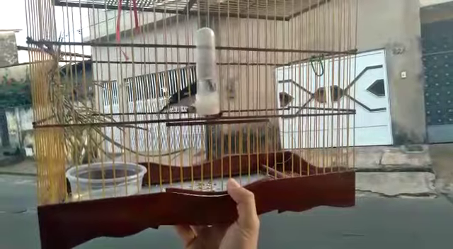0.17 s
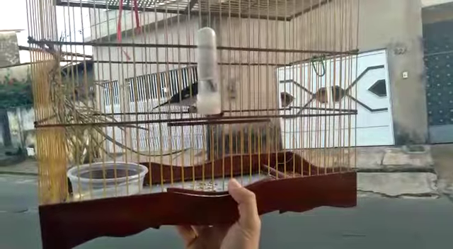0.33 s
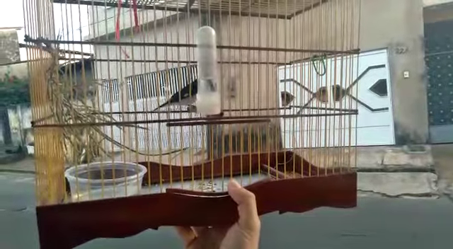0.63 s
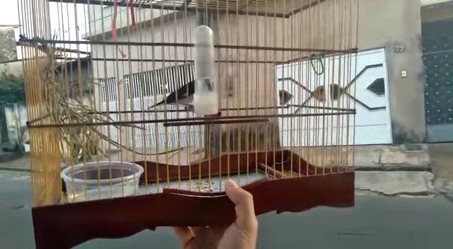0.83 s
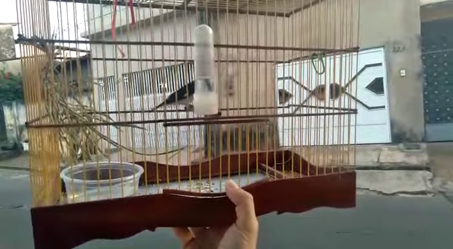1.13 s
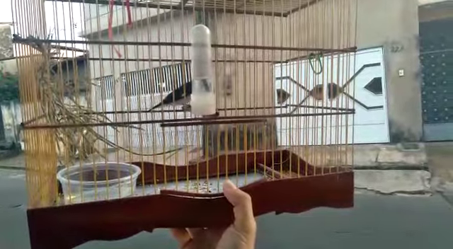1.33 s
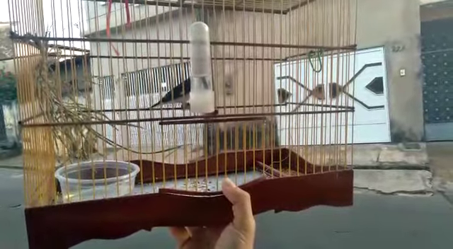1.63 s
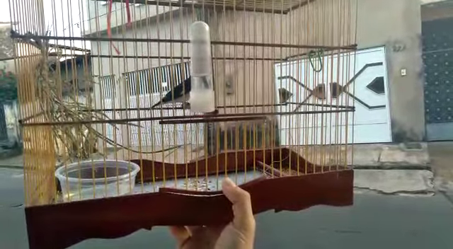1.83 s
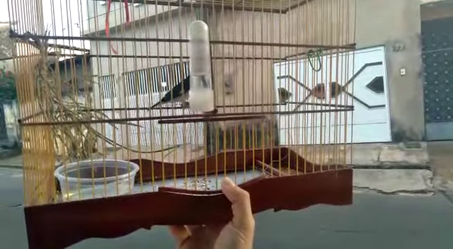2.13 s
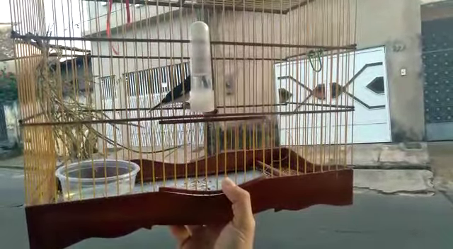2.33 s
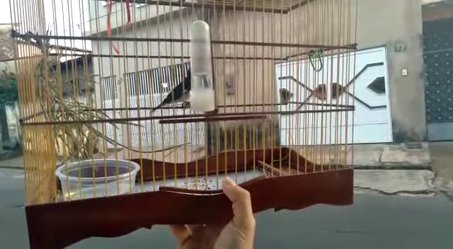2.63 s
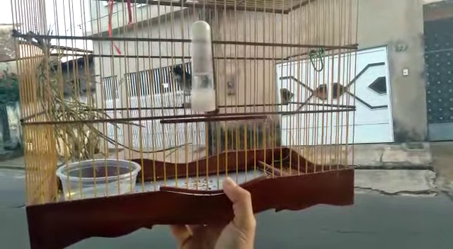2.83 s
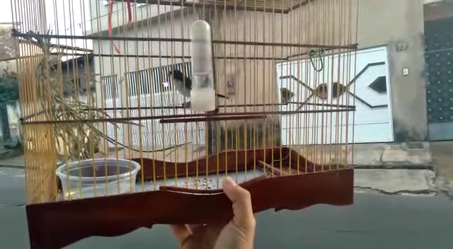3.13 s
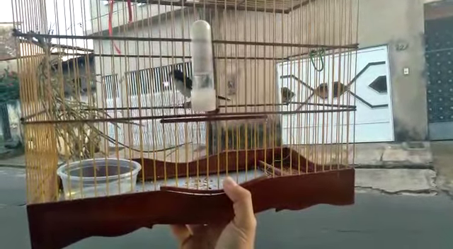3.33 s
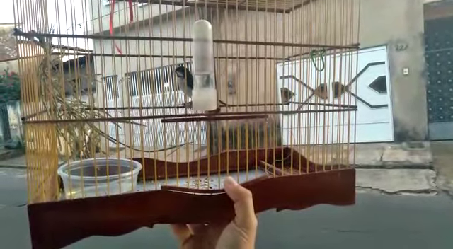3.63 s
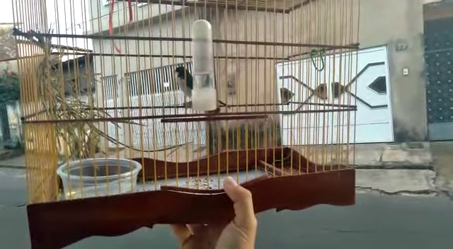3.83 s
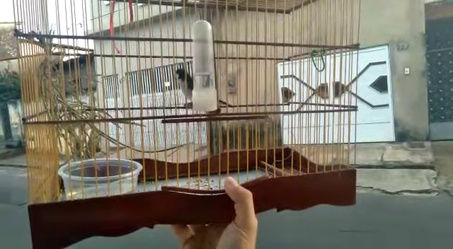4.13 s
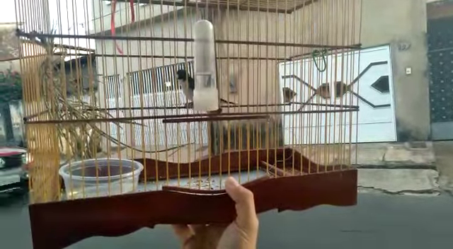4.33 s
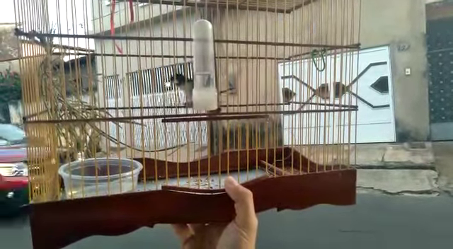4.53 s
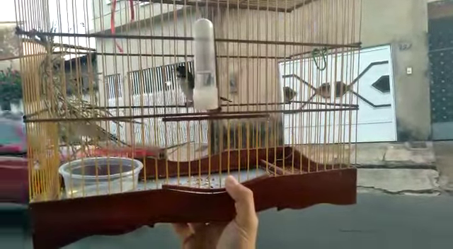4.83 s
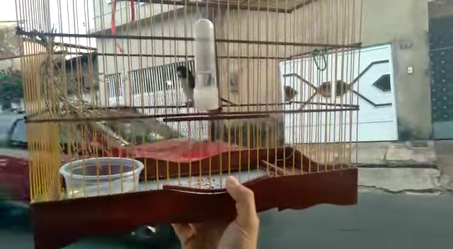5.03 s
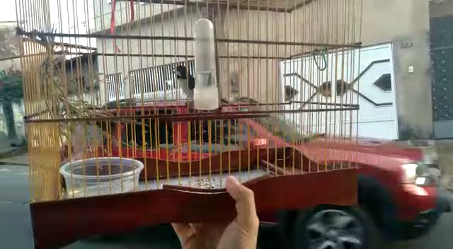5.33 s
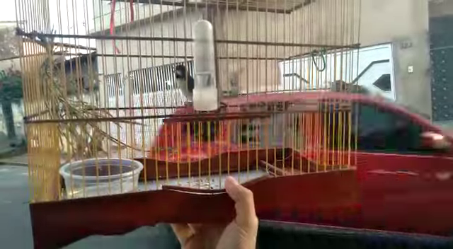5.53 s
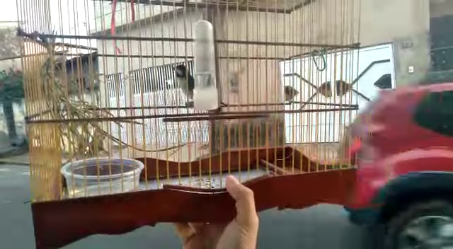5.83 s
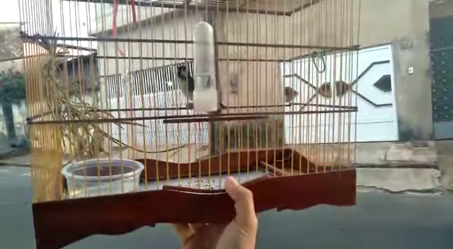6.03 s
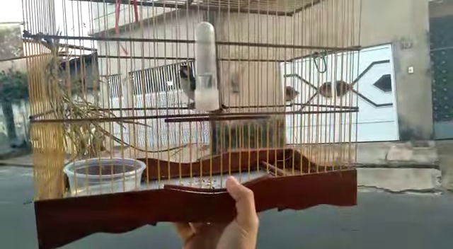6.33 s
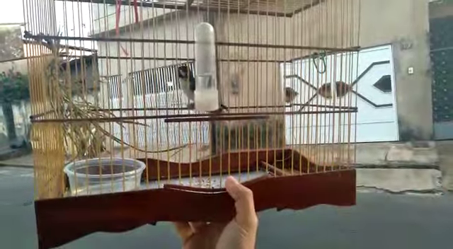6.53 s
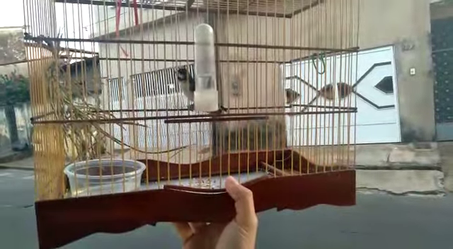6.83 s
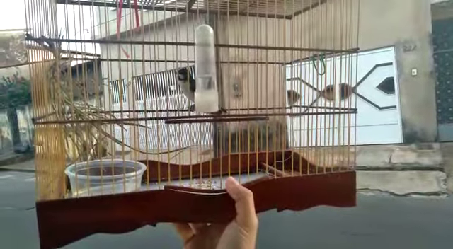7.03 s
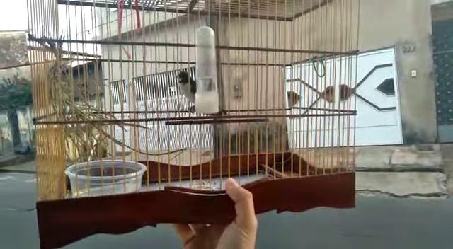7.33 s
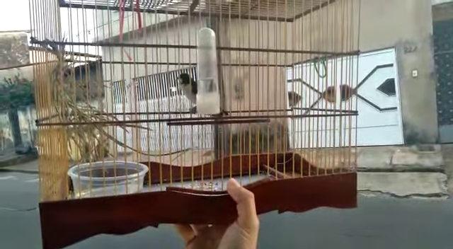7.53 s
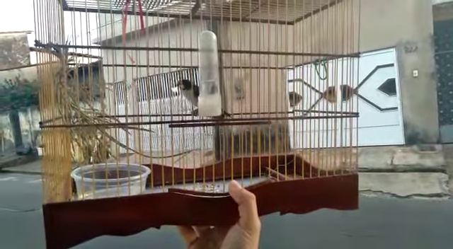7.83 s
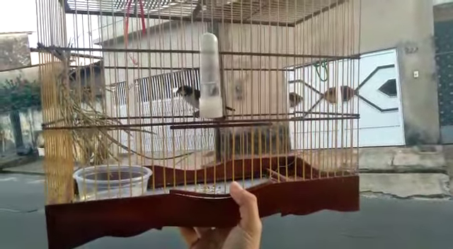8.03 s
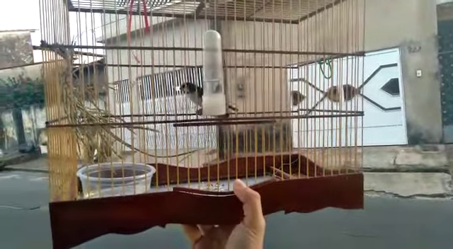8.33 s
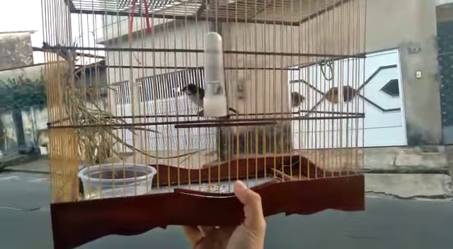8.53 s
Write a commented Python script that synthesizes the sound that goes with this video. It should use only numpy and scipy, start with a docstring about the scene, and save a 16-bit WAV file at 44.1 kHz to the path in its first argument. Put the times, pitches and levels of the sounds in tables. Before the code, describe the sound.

Thin high chirps and a far bird's whistles and trill echo between house fronts over a faint rumble. A car draws near and rolls by, engine humming and tyres hissing. Right by the microphone, a small caged bird gives a pip and four piercing whistles, then a rapid metallic trill that sinks and weakens. Soft dull knocks, wooden cage ticks and a low rustle follow.

```python
"""A narrow street, where a caged seedeater sings a pip, four falling whistles and a fast metallic trill.
Before it, a rival down the street whistles and trills, and small birds call thinly. Each voice is
a nearly pure, sliding tone from the bird's voice organ, and it echoes between the house fronts.
A car rolls past with humming engine and hissing tyres; as it leaves, a low rustle swells.
The wooden cage ticks in the hand, its bars are scratched, and dull knocks come from the street."""
import sys
import numpy as np
from scipy import signal
from scipy.fft import rfft, irfft, next_fast_len
from scipy.io import wavfile
from scipy.ndimage import uniform_filter1d, minimum_filter1d

SR = 44100
rng = np.random.default_rng(int(sys.argv[2]) if len(sys.argv) > 2 else 0)


def wrap_up_sound(samples):
    """Save the sound to the file named by the first command line argument, as 16-bit audio."""
    columns = np.atleast_2d(samples).T
    # keep every value between -1 and 1, then stretch to whole-number steps
    tamed = np.clip(columns, -1, 1)
    steps = np.round(tamed * 32767).astype(np.int16)
    wavfile.write(sys.argv[1], SR, steps)


N = 382347
T = np.arange(N) / SR   # the time of each sample, in seconds

# Levels in the tables are relative: the functions add their own gains and colours.
# The car's engine. Each row: time in seconds, firing rate in Hz, level in dB.
ENGINE_CURVE = [(0, 81, -49), (1.8, 80, -45.5), (2.42, 80.6, -35.5), (2.57, 77, -54), (2.71, 55.54, -36),
                (3.1, 59.3, -36.5), (3.33, 68.5, -33), (4.09, 69.6, -28), (4.43, 65.9, -29),
                (5.01, 56.7, -29.5), (5.2, 56.8, -32.5), (5.34, 89.3, -34.5), (6.1, 82.7, -36),
                (6.6, 74.9, -42), (8.67, 71, -62)]
# Low rumble and roar: the passing car, then a low rustle that swells after 7 seconds.
# Each row: time in seconds, rumble in dB, roar in dB.
RUMBLE_AND_ROAR_LEVELS = [(0.0, -45.5, -50), (0.99, -41.5, -50.5), (1.62, -47.5, -49.5), (1.98, -46, -47),
                          (2.63, -37.5, -41), (2.9, -40.5, -41), (3.57, -36, -37.5), (4.15, -37, -37.5),
                          (4.88, -33.5, -35), (5.84, -34.5, -44.5), (6.45, -38, -47.5), (6.76, -39, -46.5),
                          (7.03, -35.5, -44), (7.32, -34, -41), (8.16, -36.5, -46.5), (8.67, -35, -44)]
# Bands that are weak while the car is far off. Each row: low edge in Hz, high edge in Hz.
HOLLOW_BANDS = [(570, 890), (1750, 22000)]
# Tyre hiss. Each row: time in seconds, main hiss in dB, highest hiss in dB.
HISS_LEVELS = [(0, -48.5, -55), (.7, -45.5, -53.5), (1.5, -45.5, -54.5), (2.2, -40.5, -49.5),
               (3.3, -35, -42), (4.8, -30, -37), (5.3, -35.5, -40), (6, -37.5, -46), (7, -43.5, -53),
               (7.9, -58.5, -71), (8.67, -54, -76.5)]
# Two sounds that swell and fade. Each row: time in seconds, level in dB.
CHORUS_LEVELS = [(0, -36), (.35, -39), (.7, -46), (1.4, -56), (2.5, -34.5), (3.2, -46), (3.8, -36),
                 (5.5, -44), (7.1, -44), (7.6, -76)]   # very distant birds
TREAD_LEVELS = [(3.5, -63), (4.4, -39), (6.2, -45.5), (7, -45), (8.67, -63)]   # the hum of the tyre tread

# One thin, high call, repeated. Each row: start in seconds, length in seconds, level in dB.
THIN_CALL_NOTES = [(0.148, 0.095, -32.5), (1.135, .075, -33), (2.105, 0.084, -35.5), (2.81, 0.053, -34),
                   (3.699, .044, -31), (7.612, 0.088, -34.5), (8.498, 0.068, -31)]
# Sliding notes down the street. Each row: start and length in seconds, first and last pitch in Hz,
# level in dB, buzz swing in Hz, share that arrives directly (0 to 1).
SLIDING_NOTES = [(0, .2, 2326, 2192, -46.5, 0, 0.72), (0.849, 0.2, 3880, 4000, -40, 35, 0.7),
                 (0.977, 0.17, 6750, 3650, -29.5, 251, 0.15), (1.247, 0.13, 6900, 3970, -31.5, 355, .15),
                 (2.655, .18, 3943, 3856, -26.5, 236, .8), (3.092, .14, 3647, 4180, -30, 22, .78),
                 (3.312, .062, 5350, 4570, -27.5, 88, .7), (3.393, 0.042, 4450, 3460, -21.5, 33, 0.8),
                 (7.494, 0.032, 5800, 6600, -38, 350, 0.6), (8.26, .058, 8000, 8800, -44.5, 128, .27)]
# Whistles. Each row: start and length in seconds, pitch before sagging in Hz, level in dB,
# share of the full sag (0 to 1).
RIVAL_WHISTLE_NOTES = [(1.331, .08, 3960, -21, .85), (1.515, .096, 3970, -20.5, 1),
                       (1.604, 0.075, 3780, -32, 0.72)]
CAGED_WHISTLE_NOTES = [(4.972, .049, 4350, -15.5, 0.18), (5.154, .099, 4030, -10.3, 0.98),
                       (5.347, .09, 4105, -4.5, 0.96), (5.532, .094, 4120, -2.5, 1),
                       (5.716, .088, 4100, -3.3, 1)]   # the first is the pip
# The rival's trill. Each row: start in seconds, pitch in Hz, level in dB.
RIVAL_SYLLABLES = [(1.68, 3794, -30), (1.783, 4100, -23), (1.853, 4160, -24), (1.963, 4310, -22),
                   (2.04, 4050, -24), (2.136, 3850, -29), (2.227, 4000, -25), (2.37, 3950, -25.5),
                   (2.455, 3850, -30), (2.525, 4000, -26.5)]
# One syllable (note) of a trill: a lead-in, a loud high part, a step down, a slide away.
# Each row: share of its length (0 to 1), pitch ratio at full fall, level in dB.
SYLLABLE_SHAPE = [(0, .95, -25), (.07, 0.97, -1), (.14, .97, -18), (.2, 1, 1), (.51, .99, 2), (.6, .8, -3),
                  (.82, .75, -5), (0.891, .65, -21), (1, .52, -30)]
# Quick slides as a loud whistle opens or snaps shut.
# Each row: start in seconds, first pitch in Hz, last pitch in Hz, level in dB.
FLICK_NOTES = [(5.341, 2700, 3700, -36), (5.434, 3900, 3550, -9), (5.527, 2700, 3680, -29.5),
               (5.626, 4050, 3420, -10), (5.712, 2700, 3690, -30.5), (5.813, 4200, 3000, -24.5)]
# The caged bird's trill, which slows, sinks and weakens as it tires. Each row: start and length in
# seconds, pitch in Hz, share of the full fall (0 to 1), warbles per second, swing in Hz, level in dB.
CAGED_SYLLABLES = [(5.877, .028, 3300, .3, 60, 450, -10), (5.894, .06, 3500, .5, 105, 560, -7),
                   (5.981, .063, 4340, 0.99, 80, 500, -3.5), (6.073, .062, 4450, 0.99, 80, 480, -2.5),
                   (6.164, .064, 4440, 0.95, 80, 480, -2.5), (6.254, .062, 4400, 0.92, 82, 480, -2),
                   (6.345, .063, 4373, 0.94, 80, 500, -2.5), (6.437, .064, 4285, 0.99, 80, 540, -3),
                   (6.532, .064, 4200, 1, 73, 580, -3.5), (6.628, .063, 4080, 1, 72, 620, -4.5),
                   (6.717, .063, 4030, 1, 76, 620, -5), (6.828, .062, 3840, 0.97, 68, 660, -8.5)]
# Reflections close to the cage. Each row: delay in milliseconds, level in dB.
CLOSE_ECHOES = [(4.4, -18.5), (9.2, -13.5)]

# Short noises. Each row: start in seconds, level in dB, seconds to fade by 60 dB.
BAR_SCRATCHES = [(0.444, -27.5, 0.18), (2.062, -33, 0.048), (2.335, -24, 0.018)]
STREET_KNOCKS = [(5.615, -17.5, 0.11), (6.005, -19, 0.18), (7.087, -22.5, 0.095), (7.445, -26, 0.1),
                 (7.497, -26, 0.13), (7.648, -32, 0.12), (8.001, -26.5, 0.13), (8.38, -32.5, 0.26)]
# Ticks of the wooden cage. Each row: start in seconds, level in dB.
CAGE_TICKS = [(2.425, -20), (2.505, -22.5), (7.164, -27), (7.392, -16.5), (7.754, -22), (8.383, -26),
              (8.441, -28.5)]
# The tones the cage frame rings at. Each row: pitch in Hz, level in dB, seconds to fade by 60 dB.
FRAME_TONES = [(1230, -8, 0.063), (1410, 7, 0.023), (1620, 7.5, 0.022), (2020, 3.5, 0.022),
               (2390, -5, 0.037), (3340, -16, 0.018)]

# The tones that make up one pitched sound. Each row: multiple of the pitch, level in dB.
ENGINE_TONES = [(1, -1), (2, -11), (3, -17.5), (4, -16), (5, -17), (6, -16)]
WHISTLE_TONES = [(1, 1.5), (2, -19.5), (3, -27), (4, -41)]
TRILL_TONES = [(1, -2.5), (2, -19.5), (3, -28.5), (4, -37.5)]

# Colours: how strong a sound is from low to high. Each row: frequency in Hz, level in dB.
LOW_RUMBLE_COLOUR = [(18, -45), (30, -14), (49, -10), (65, -6), (98, -6), (188, -10.5), (268, -11),
                     (314, -14.5), (423, -14), (622, -18.5), (900, -21.5), (1170, -36), (1980, -120)]
MID_ROAR_COLOUR = [(600, -24.5), (800, -7.5), (1050, 3), (1500, 0), (2000, -4), (2800, -8.5), (4000, -43.5),
                   (6000, -14)]
TYRE_HISS_COLOUR = [(3500, -7.5), (4700, -6.5), (5500, -8.5), (6800, -3), (7800, 0), (8800, -1),
                    (10000, -10.5), (11500, -25.5)]
HIGH_HISS_COLOUR = [(8500, -15), (10300, -5), (12000, -9), (14000, -7.5), (15800, -9)]
FAR_CHORUS_COLOUR = [(2700, -28), (3350, -8), (3800, 0), (4250, -4), (4800, -22)]
BAR_SCRATCH_COLOUR = [(3500, -7), (5200, -31), (6000, 8), (6800, -8), (8200, 3), (10500, -12), (15000, -15)]
DOWN_STREET_COLOUR = [(2800, -5), (3350, -4.5), (3850, 2), (4300, -3.5), (4900, -9.5), (8000, -6)]   # the rival's trill as it carries to us
TREAD_HUM_COLOUR = [(370, -24), (435, -2.5), (500, -18)]
BEAK_AND_CAGE_COLOUR = [(2000, -3), (2900, -3), (3300, 5), (3620, -4), (3930, -4), (4090, 0), (4330, 4.5),
                        (4650, -4), (4950, -8), (5600, -3), (6300, -3), (7000, -6), (9200, 2), (10400, -12),
                        (11800, 5.5), (12700, -10.5), (13700, 15.5), (15300, 5)]   # a sliding note flares as it crosses a peak
HOUSE_FRONT_COLOUR = [(2500, -5), (3100, -0.5), (3800, -1.5), (4400, -2), (5200, -7.5), (9000, -16.5),
                      (15000, -6.5)]   # what the walls send back
DULL_KNOCK_COLOUR = [(60, 3), (150, 0), (400, 3.5), (580, 2.5), (900, -5.5), (1300, -14), (2200, -26),
                     (5000, -34)]
TRILL_RASP_COLOUR = [(4800, -3), (5500, -1), (6300, 2), (7200, -12.5), (9000, -4), (10200, -18),
                     (15000, -18)]


def from_db(db):
    """Turns decibels into a number to multiply by."""
    return 10 ** (np.asarray(db) / 20)


def in_time(rows):
    """Joins a table's points into one curve for each column after the time."""
    times, *columns = np.transpose(rows)
    return [np.interp(T, times, column) for column in columns]


def add(out, start, sound):
    """Mixes a sound in at a start time in seconds."""
    first = max(round(start * SR), 0)
    out[first:first + len(sound)] += sound[:max(N - first, 0)]


def unit_power(x):
    """Scales a signal so that its average power is 1."""
    return x / np.sqrt(np.mean(x ** 2) + 1e-20)


def drift(rate):
    """A random wander that turns `rate` times a second."""
    turns = np.arange(0, T[-1] + 2 / rate, 1 / rate)
    return unit_power(np.interp(T, turns, rng.standard_normal(len(turns))))


def coloured(x, colour):
    """Filters a sound by a colour table, falling away steeply beyond its ends."""
    hz, db = np.transpose(colour)
    size = 2 * next_fast_len(N // 2 + 1)
    freqs = np.maximum(np.fft.rfftfreq(size, 1 / SR), 1)
    gain = from_db(np.interp(np.log(freqs), np.log(hz), db))
    edges = np.minimum(1, np.minimum(freqs / hz[0], hz[-1] / freqs)) ** 4
    return irfft(rfft(x, size) * gain * edges)[:N]


def noise(colour):
    """Steady noise of a given colour."""
    return unit_power(coloured(rng.standard_normal(N), colour))


def car_engine():
    """The engine's firing makes a hum, with overtones at multiples of its rate."""
    firing_hz, level_db = in_time(ENGINE_CURVE)
    phase = 2 * np.pi * np.cumsum(firing_hz * (1 + .01242 * drift(14))) / SR
    return np.sqrt(2) * sum(from_db(level_db + db + drift(18)) * np.sin(k * phase)
                            for k, db in ENGINE_TONES)


def rumble_and_roar():
    """Low rumble and roar: the passing car, then a low rustle that swells after 7 seconds."""
    rumble_db, roar_db = in_time(RUMBLE_AND_ROAR_LEVELS)
    rumble = from_db(rumble_db + 2 + .9 * drift(17)) * noise(LOW_RUMBLE_COLOUR)
    roar = from_db(roar_db + 2 + .84 * drift(20)) * noise(MID_ROAR_COLOUR)
    both = rumble + roar
    # the sound is hollow at first and fills in as the car nears
    filters = [signal.butter(2, band, "band", fs=SR, output="sos") for band in HOLLOW_BANDS]
    hollows = sum(signal.sosfiltfilt(band, both) for band in filters)
    missing_share = np.interp(T, [1.7, 2.5, 5.0], [.8, .3, .05])
    return both - missing_share * hollows


def tyre_hiss():
    """The tyres hiss on the road, swelling as the car passes."""
    hiss_db, high_db = in_time(HISS_LEVELS)
    hiss = from_db(hiss_db + .5 * drift(15)) * noise(TYRE_HISS_COLOUR)
    return hiss + from_db(high_db) * noise(HIGH_HISS_COLOUR)


def far_chorus():
    """Very distant birds and their echoes blur into a faint wash of noise."""
    level_db, = in_time(CHORUS_LEVELS)
    return from_db(level_db + 1.2 * drift(25)) * noise(FAR_CHORUS_COLOUR)


def bird_voice(hz, db, tones):
    """A nearly pure tone whose overtones grow as the bird nears full air pressure."""
    phase = 2 * np.pi * np.cumsum(hz) / SR
    pressure = np.minimum(from_db(db), 1) ** .17
    voice = 0
    for k, tone_db in tones:
        strength = from_db(tone_db) * (pressure if k > 1 else 1)
        voice += strength * np.sin(k * phase) * (k * hz < SR / 2)   # skip tones too high to store
    return from_db(db) * voice


def street_echoes(x, fade_s, first_s):
    """Scattered echoes between the house fronts, dying by 60 dB in fade_s."""
    t = T[:SR]
    echoes = rng.standard_normal(SR) * (rng.random(SR) < .05)
    echoes *= (t > first_s) * from_db(-60 * t / fade_s)
    return signal.fftconvolve(x, echoes / np.linalg.norm(echoes))[:N]


def far_note(glide_hz, db, swing_hz, buzzes_per_s=70):
    """A gliding note that swells and fades; a fast swing in pitch makes it buzz."""
    t = T[:len(glide_hz)]
    pitch = glide_hz + swing_hz * np.sin(2 * np.pi * buzzes_per_s * t)
    swell = np.abs(np.sin(np.pi * t / t[-1])) ** .5
    return bird_voice(pitch, db, tones=[(1, 1.5), (2, -30)]) * swell


def small_birds():
    """Thin calls and slides. Returns the part heard directly and the part sent to the walls."""
    direct, to_walls, notes = np.zeros(N), np.zeros(N), []
    thin_start_hz, thin_drop_hz, thin_direct_share = 8750, 1450, .6
    for start, length, db in THIN_CALL_NOTES:
        progress = np.linspace(0, 1, round(length * SR))
        glide_hz = thin_start_hz - thin_drop_hz * progress ** 2
        notes.append((start, far_note(glide_hz, db, swing_hz=220), thin_direct_share))
    for start, length, first_hz, last_hz, db, swing_hz, share in SLIDING_NOTES:
        remaining = np.linspace(1, 0, round(length * SR))
        glide_hz = last_hz + (first_hz - last_hz) * remaining ** 1.5   # fast, then levelling off
        notes.append((start, far_note(glide_hz, db, swing_hz), share))
    for start, note, share in notes:
        add(direct, start, share * note)
        add(to_walls, start, np.sqrt(1 - share ** 2) * note)
    return direct, to_walls


def contacts(events, colour, rise_s):
    """Scratches or knocks: each touch is a burst of noise that swells quickly and dies."""
    loudness, t = np.zeros(N), T[:SR // 2]
    for start, db, fade_s in events:
        add(loudness, start, from_db(db - 60 * t / fade_s) * (1 - np.exp(-t / rise_s)))
    return loudness * noise(colour)


def whistle(notes, tones):
    """Each whistle arches up to its pitch, then sags and fades a little before it stops."""
    scoop_hz, scoop_s, sag_hz_per_s = 260, .007, 3500
    rise_s, release_s, fade_db_per_s = .024, .018, 45
    out, waver = np.zeros(N), drift(300)
    for start, length, hz, db, sag in notes:
        t = T[:round(length * SR)]
        below_hz = sag_hz_per_s * t + scoop_hz * np.exp(-t / scoop_s)
        pitch = (hz - sag * below_hz) * (1 + .0011 * np.interp(start + t, T, waver))
        swell = np.clip(np.minimum(t / rise_s, (length - t) / release_s), 1e-4, 1)
        level_db = db + 20 * np.log10(swell) - fade_db_per_s * (t - length / 2)
        add(out, start, bird_voice(pitch, level_db, tones))
    return out


FIRST_CREST_S = .004   # how far into a syllable its warble first peaks


def trill(syllables, tones, jitter, flutter_db):
    """One falling syllable repeats under a fast warble; pitch and air pressure tremble."""
    speedup, crest_dip_db = .27, 6
    lead_swing_hz, lead_s = 600, .00702
    position, pitch_ratio, shape_db = np.transpose(SYLLABLE_SHAPE)
    out, flutter = np.zeros(N), drift(450)
    tremble = drift(2200) + drift(140)   # a fine rasp, and each turn overshoots differently
    for start, length, hz, fall, rate, warble_hz, db in syllables:
        t = T[:round(length * SR)]
        progress, first = t / length, round(start * SR)
        here = slice(first, first + len(t))
        cycles = rate * (t - FIRST_CREST_S) * (1 + speedup * progress)
        warble = 1 - np.pi / 2 * np.abs(np.sin(np.pi * cycles))   # sharp crests, round troughs
        # the lead-in swings wider
        swing_hz = warble_hz + fall * lead_swing_hz * np.exp(-(t / lead_s - 1) ** 2)
        centre_hz = hz * np.interp(progress, position, pitch_ratio) ** fall
        pitch = (centre_hz + swing_hz * warble) * (1 + jitter * tremble[here])
        level_db = db + np.interp(progress, position, shape_db) + flutter_db * flutter[here]
        level_db -= crest_dip_db * progress * warble   # the tone dips at each crest, ever deeper
        add(out, start, bird_voice(pitch, level_db, tones))
    return out


def rival_bird():
    """Whistles and a trill down the street. Returns the direct part and the part sent to the walls."""
    length_s, fall, warbles_per_s, swing_hz = .056, .32, 80, 520
    whistles = whistle(RIVAL_WHISTLE_NOTES, tones=[(1, 0), (2, -30)])
    syllables = [(start, length_s, hz, fall, warbles_per_s, swing_hz, db)
                 for start, hz, db in RIVAL_SYLLABLES]
    rattle = trill(syllables, tones=[(1, .5), (2, -31)], jitter=.0344, flutter_db=2.5)
    rattle = from_db(-2.5) * coloured(rattle, DOWN_STREET_COLOUR)
    return from_db(-1.5) * whistles + rattle, from_db(-9) * whistles + rattle


def cage_ticks():
    """Each tick rings the wooden frame's tones in a slightly different mix."""
    out, t = np.zeros(N), T[:SR // 8]
    hz, tone_db, fade_s = np.transpose(FRAME_TONES)[:, :, None]
    ringing = from_db(-60 * t / fade_s) * np.sin(2 * np.pi * hz * t)
    for start, db in CAGE_TICKS:
        strength = from_db(db - 9 + tone_db + rng.normal(0, .83, hz.shape))
        direction = rng.choice([-1, 1], hz.shape)
        add(out, start, np.sum(strength * direction * ringing, axis=0))
    return out


def tyre_tread():
    """The tread pattern hums, loudest as the car goes by."""
    level_db, = in_time(TREAD_LEVELS)
    return from_db(level_db) * noise(TREAD_HUM_COLOUR)


def caged_bird():
    """Clean whistles, then a trill whose quick sweeps beat against their own close echoes."""
    whistles = whistle(CAGED_WHISTLE_NOTES, WHISTLE_TONES) + flicks()
    rattle = trill(CAGED_SYLLABLES, TRILL_TONES, jitter=.015, flutter_db=2.6)
    rattle += sum(from_db(db) * np.interp(T - ms / 1000, T, rattle) for ms, db in CLOSE_ECHOES)
    song = coloured(whistles + rattle, BEAK_AND_CAGE_COLOUR) + rasp()
    # the held whistles ring on in the street more than the quick trill
    to_walls = from_db(-13) * whistles + from_db(-18.5) * rattle
    return song + street_echoes(coloured(to_walls, HOUSE_FRONT_COLOUR), fade_s=.48, first_s=.008)


def flicks(length_s=.013):
    """The pitch slides briefly as a loud whistle opens or snaps shut."""
    out, progress = np.zeros(N), np.linspace(0, 1, round(length_s * SR))
    for start, first_hz, last_hz, db in FLICK_NOTES:
        pitch = first_hz + (last_hz - first_hz) * progress
        add(out, start, bird_voice(pitch, db, WHISTLE_TONES) * np.sin(np.pi * progress))
    return out


def rasp(gain_db=-23.5, fade_db_per_s=280):
    """A bright, grainy noise opens each syllable of the caged bird's trill."""
    loudness = np.zeros(N)
    for start, length, _, fall, _, _, db in CAGED_SYLLABLES:
        t = T[:round(length * SR)]
        add(loudness, start + FIRST_CREST_S, fall * from_db(db + gain_db - fade_db_per_s * t))
    return loudness * from_db(4 * drift(400)) * noise(TRILL_RASP_COLOUR)


def scene():
    """The car, the late rustle, the birds and the small noises, mixed into one channel."""
    background = car_engine() + rumble_and_roar() + tyre_hiss() + tyre_tread()
    calls, calls_to_walls = small_birds()
    rival, rival_to_walls = rival_bird()
    echoes = street_echoes(calls_to_walls + rival_to_walls, fade_s=.9, first_s=.003)
    birds = far_chorus() + calls + rival + echoes + caged_bird()
    scratches = contacts(BAR_SCRATCHES, BAR_SCRATCH_COLOUR, rise_s=.0016)
    knocks = contacts(STREET_KNOCKS, DULL_KNOCK_COLOUR, rise_s=.00086)
    return (background + birds + scratches + cage_ticks() + knocks)[None]


def limiter(x, ceiling, hold_s):
    """Turns the volume down for a moment around each peak over the ceiling."""
    size = round(hold_s * SR)
    gain = minimum_filter1d(np.minimum(1, ceiling / (np.abs(x) + 1e-9)), size)
    return x * uniform_filter1d(gain, size)


def record(dry):
    """Holds down loud peaks, rounds them off and cuts the highest treble."""
    cutoff_hz = 15780
    held = limiter(dry, ceiling=.88, hold_s=.003)
    rounded = held / (1 + (held / .95) ** 6) ** (1 / 6)
    treble_cut = signal.ellip(10, .05, 70, cutoff_hz, fs=SR, output="sos")
    return signal.sosfiltfilt(treble_cut, rounded)


dry = scene()
out = record(dry)
wrap_up_sound(out)
```